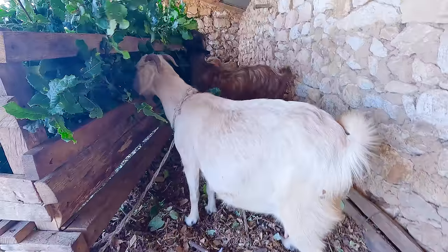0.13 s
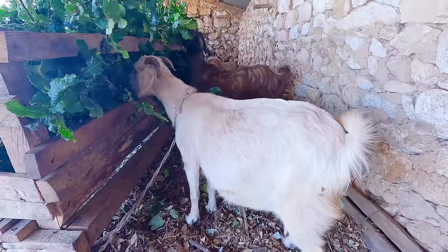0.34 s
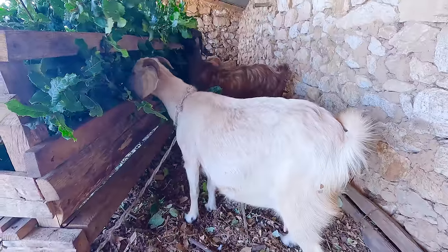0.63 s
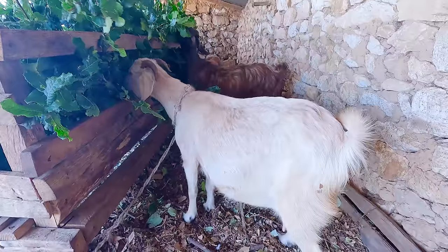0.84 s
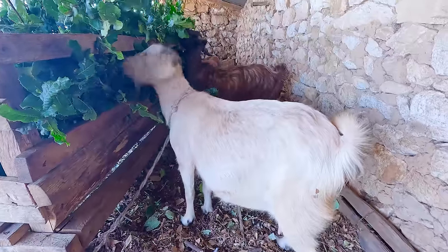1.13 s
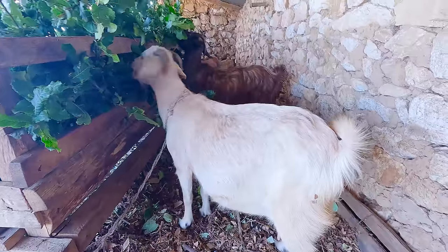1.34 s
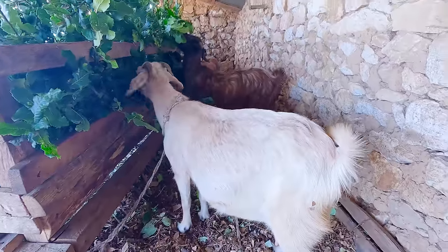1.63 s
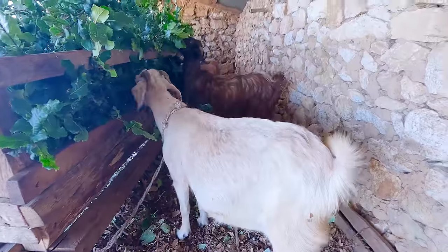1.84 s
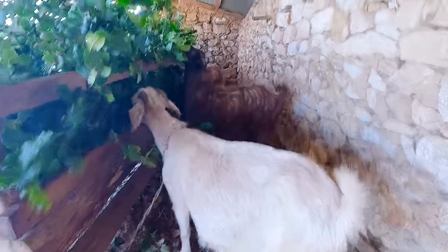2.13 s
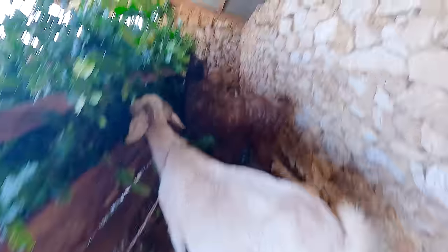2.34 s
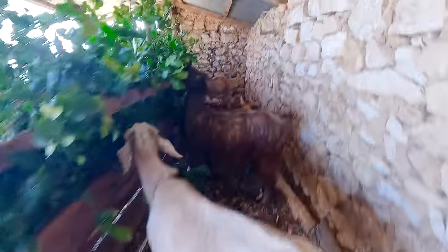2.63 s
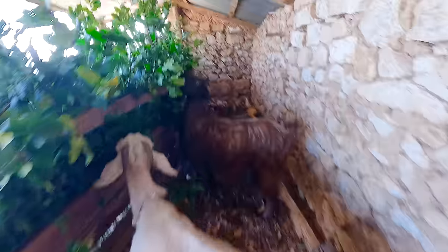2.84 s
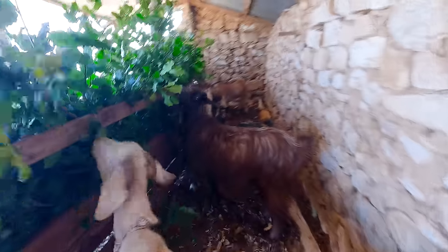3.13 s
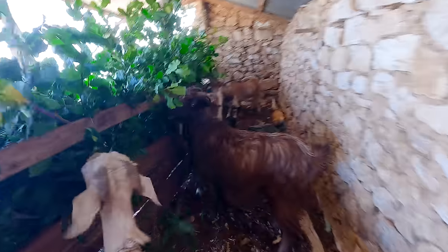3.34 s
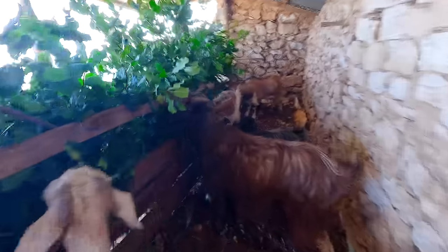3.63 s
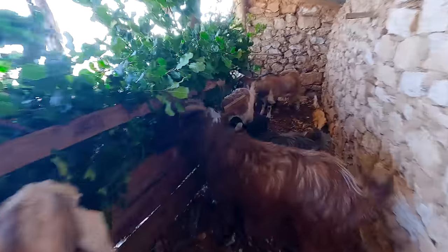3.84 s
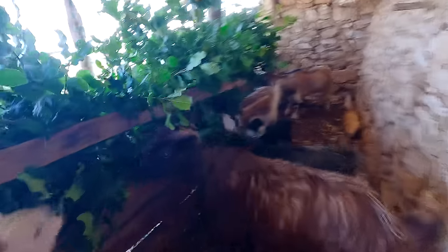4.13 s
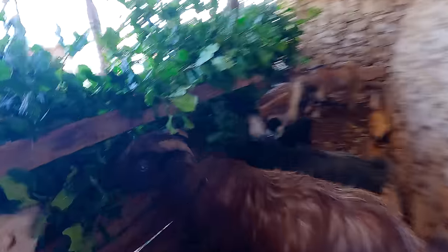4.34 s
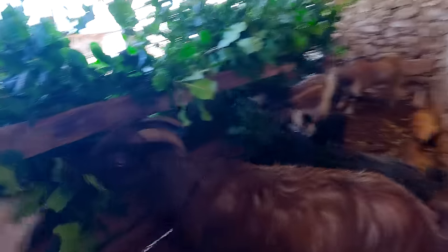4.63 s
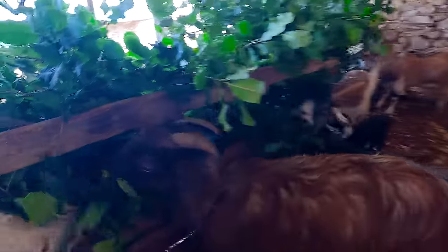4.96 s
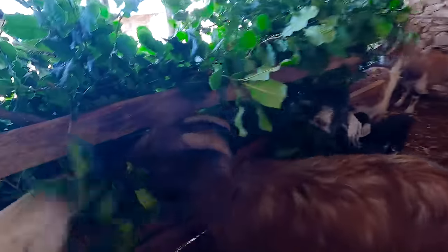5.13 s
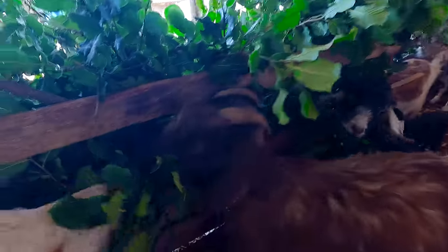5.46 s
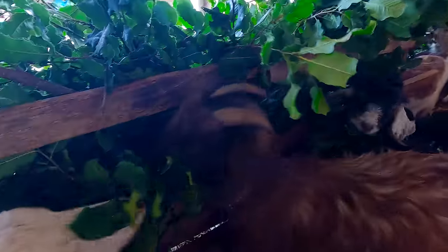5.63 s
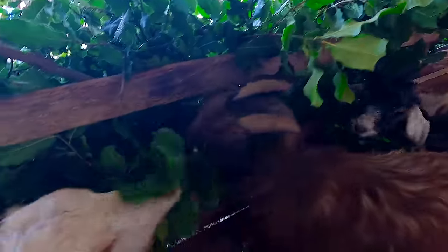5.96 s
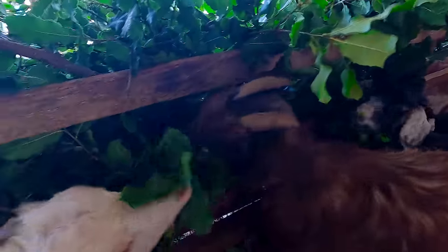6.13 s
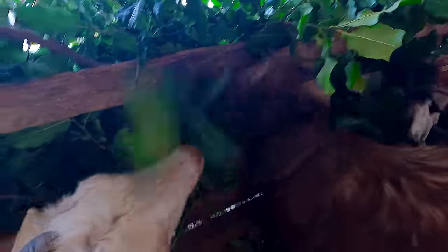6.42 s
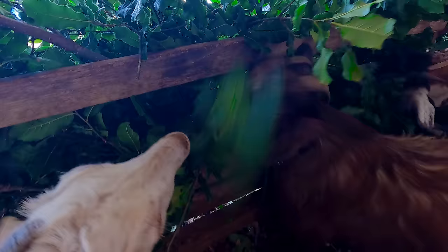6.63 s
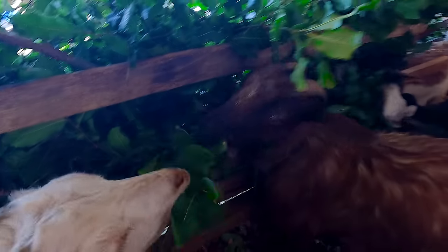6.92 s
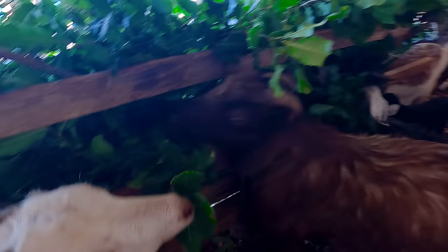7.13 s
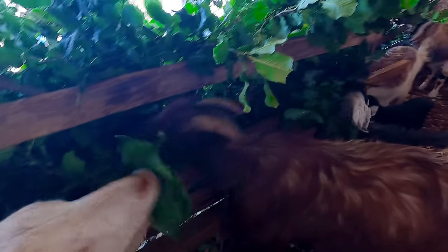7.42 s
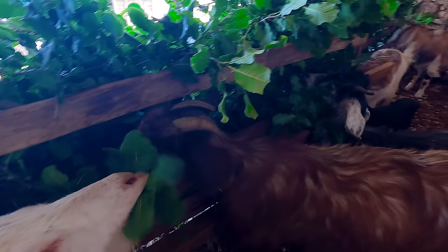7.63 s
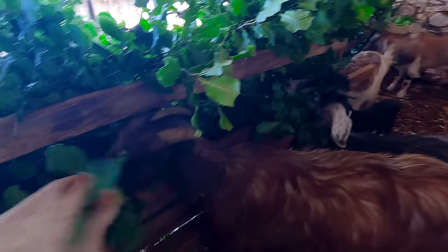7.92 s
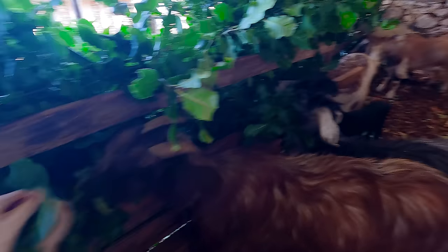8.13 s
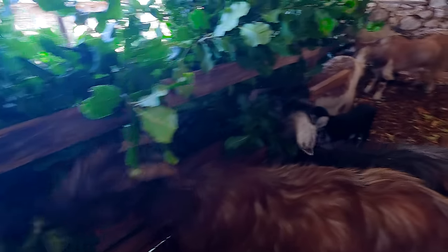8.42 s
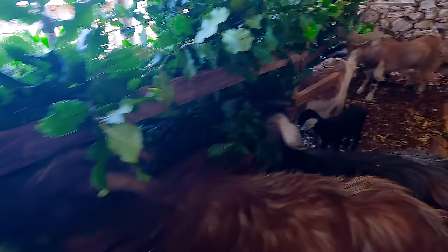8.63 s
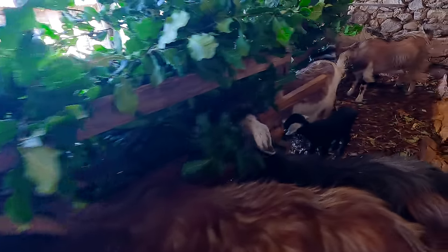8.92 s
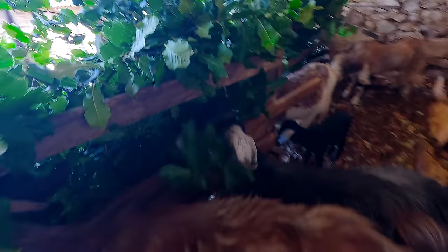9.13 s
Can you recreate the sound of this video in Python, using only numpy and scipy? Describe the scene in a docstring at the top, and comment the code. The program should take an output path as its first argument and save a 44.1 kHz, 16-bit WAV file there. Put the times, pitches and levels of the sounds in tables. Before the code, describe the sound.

A small leaf rustle opens, then stronger tugs come in bursts, brightest around five and nearly seven seconds. Crisp snaps, woody knocks, short hollow tones, a few wet lip smacks and tooth crunches punctuate them. Faint herd munching and low handling rumble lie underneath, heard close in a small, hard-walled shed.

```python
"""Goats feed on fresh leafy branches in a wooden rack inside a stone shed, heard from in front of them.
From the start tugs set stiff leaves crackling (resonant grains over hiss) and drag duller stems, over the
herd's faint munching and a low rumble (low noise) of hooves and handling, swelling in soft thuds.
Within a second stalks snap (noise bursts) and hollow knocks and tones sound (decaying modes); then lips
smack (wet ticks), teeth crunch (grit in mouth resonances), and leaves stir more in the second half."""
import sys
import numpy as np
from scipy import signal
from scipy.fft import rfft, irfft, next_fast_len
from scipy.io import wavfile
from scipy.ndimage import map_coordinates

SR = 44100
rng = np.random.default_rng(int(sys.argv[2]) if len(sys.argv) > 2 else 0)


def inscribe(sig):
    """Save sig as 16-bit PCM at rate SR to the path in sys.argv[1].

    A 1-D sig is mono; a 2-D sig holds one channel per row.
    Samples are clipped to [-1, 1] before scaling.
    """
    pcm = np.round(np.clip(np.atleast_2d(sig).T, -1, 1) * 32767)
    wavfile.write(sys.argv[1], SR, pcm.astype(np.int16))


N = 409688

# Leaves stirred by the whole herd. Each row: time in seconds, relative level in dB.
HERD_STIRRING = [(1.6, -52.5), (2.1, -49.5), (3.4, -50), (4.5, -46), (5.7, -46.5), (7, -45.5), (8.25, -49),
                 (9.29, -45.5)]


def amp(db):
    """Decibels to gain."""
    return 10 ** (np.asarray(db) / 20)


def unit(x):
    """Scale to rms 1."""
    return x / np.sqrt(np.mean(x ** 2) + 1e-20)


def fade(t, t60):
    """Exponential decay, down 60 dB after t60 seconds."""
    return np.exp(-np.log(1000) * t / np.maximum(t60, 1e-4))


def along(points, hz):
    """Read (Hz, value) points at the given frequencies on a log axis."""
    f, v = np.transpose(points)
    return np.interp(np.log(hz + 1), np.log(f), v)


def curve(rows):
    """Turn (s, value) rows into one value per sample."""
    return np.interp(np.arange(N) / SR, *np.transpose(rows))


def wobble(rate):
    """A smooth random curve with rate knots a second."""
    knots = rng.standard_normal(int(N * rate / SR) + 4)
    return map_coordinates(knots, [np.arange(N) * rate / SR])


def filtered(x, response):
    """Multiply the spectrum of x by a response of frequency."""
    m = next_fast_len(N + SR // 2)
    return irfft(rfft(x, m) * response(np.fft.rfftfreq(m, 1 / SR)), m)[..., :N]


def colour(x, spectrum, size=4096):
    """Causal (minimum-phase) filter of energy 1 with the given spectrum."""
    cepstrum = irfft(np.log(amp(along(spectrum, np.fft.rfftfreq(size, 1 / SR)))))
    kernel = irfft(np.exp(rfft(2 * cepstrum[:size // 2], size)))
    return signal.oaconvolve(x, kernel / np.linalg.norm(kernel))[:N]


def resonate(x, hz, q):
    """One damped resonance."""
    return signal.lfilter(*signal.iirpeak(min(hz, SR / 3), max(q, 1), SR), x)


def add(track, s, sound):
    """Mix a sound in at time s."""
    part = track[max(round(s * SR), 0):][:len(sound)]
    part += sound[:len(part)]


def ticks(rate, spread_db):
    """Random contacts, rate a second: many small, a few large."""
    sizes = amp(spread_db * np.minimum(rng.standard_normal(N), 1.8))
    touching = rng.random(N) < rate / SR
    signs = rng.choice([-1, 1], N)
    return unit(touching * sizes * signs / np.sqrt(rate))


def crackle(rate, spread_db, low_hz, high_hz, q, clump_db, count=8):
    """Pieces of several sizes, each ticking in its own clusters at its own pitch."""
    grains = np.zeros(N)
    for hz in np.geomspace(low_hz, high_hz, count):
        piece = resonate(ticks(rate / count, spread_db), hz, q)
        grains += piece * amp(clump_db * wobble(45))
    return unit(grains)


def pulls():
    """Levels in dB of leaves and of stems: each pull builds to its release, then the branch settles."""
    # A goat pulls a branch and lets go. Each row: release in seconds, relative rustle level in dB,
    # pull time in seconds, settling time in seconds, relative stem drag level in dB.
    tugs = [(0.045, -42.5, 0.04, 0.21, -61), (1.095, -34, 0.22, 0.11, -50.5),
            (2.296, -36.5, 0.27, 0.14, -46.5), (2.725, -41, 0.022, 0.1, -57),
            (2.836, -34.5, 0.18, 0.075, -43), (3.111, -34, 0.21, 0.13, -43), (3.345, -44, 0.076, 0.06, -70),
            (3.6, -48, 0.14, 0.39, -52), (3.92, -45, 0.35, 0.32, -51.5), (4.299, -34, 0.046, 0.073, -44.5),
            (4.79, -37, 0.24, 0.28, -45.5), (4.915, -34, 0.11, 0.11, -42), (5.125, -31, 0.24, 0.15, -45.5),
            (6.115, -39.5, .13, 0.081, -49), (6.18, -38, 0.13, 0.032, -43.5), (6.375, -34, 0.15, 0.29, -47),
            (6.712, -31, 0.028, 0.08, -39.5), (6.76, -32, 0.06, 0.035, -44),
            (7.108, -42.5, 0.012, 0.088, -40.5), (7.181, -37, 0.06, 0.3, -44),
            (7.438, -33, 0.06, 0.046, -49.5), (7.529, -40.5, 0.11, 0.4, -52.5),
            (7.72, -45, 0.13, 0.23, -50), (7.999, -43, 0.049, 0.15, -49), (8.187, -42, 0.04, 0.12, -54),
            (8.35, -42.5, 0.035, 0.14, -62), (8.484, -35, 0.095, 0.26, -45), (8.86, -43.5, .4, 0.35, -52.5),
            (9.1, -41.5, 0.073, 0.27, -52)]
    pull_db = 20  # rise over a pull time, and fall over a settling time
    roundness = 1.24  # above 1 a pull holds near its top, then drops away
    stirred_stems_db = -14  # stem drag under the herd's stirring
    t = np.arange(N) / SR
    leaf = amp(curve(HERD_STIRRING)) ** 2
    stem = leaf * amp(stirred_stems_db) ** 2
    for s, db, pull, settling, stem_db in tugs:
        slack = np.maximum((s - t) / pull, (t - s) / settling) ** roundness
        power = amp(-pull_db * slack) ** 2
        leaf = leaf + amp(db) ** 2 * power
        stem = stem + amp(stem_db) ** 2 * power
    return 10 * np.log10(leaf), 10 * np.log10(stem)


def leaves(tug_db):
    """A harder tug makes more leaves collide and sounds brighter, over the hiss of leaves sliding."""
    # Spectrum of the leaves. Each row: frequency in Hz, relative level in dB per Hz.
    leaf_spectrum = [(150, -5.5), (700, -11.5), (1050, 0), (2700, 0.5), (5000, 0.5), (7300, 0),
                     (8300, -4.5), (9800, -6), (10900, -16), (14300, -24), (15700, -45)]
    # Body of the rustle, below about 3 kHz. Each row: time in seconds, relative level in dB.
    fullness = [(1.05, -2), (2.2, -1), (2.85, 2), (4.3, 0), (5, -1), (6.15, 3.5), (6.4, -0.5), (8.5, 2.5)]
    effort_db = tug_db - tug_db.mean()
    contacts = 1800 * amp(.9 * effort_db)  # a second
    grains = crackle(contacts, spread_db=4.3, low_hz=1124, high_hz=12500, q=1.62, clump_db=4.5)
    sliding = amp(-1.5) * rng.standard_normal(N)
    rustle = unit(colour(grains + sliding, leaf_spectrum))
    dull = filtered(rustle, lambda hz: 1 / (1 + (hz / 3000) ** 4))
    bright = rustle - dull
    # harder tugs have less body, so they sound brighter
    body_db = curve(fullness) - 0.13 * effort_db + 1.94 * wobble(12)
    # single leaves catch and let go
    flutter_db = wobble(30) + 1.8 * wobble(140)
    return amp(tug_db + flutter_db - 1.45) * (bright + dull * amp(body_db))


def stems(drag_db):
    """Thick stems stick and slip on the boards with a duller rattle; each tug jerks them along."""
    # Spectrum of the stems. Each row: frequency in Hz, relative level in dB per Hz.
    stem_spectrum = [(60, -32), (150, -3), (300, -4.5), (520, -2), (750, -4), (1100, -5.5), (1800, -8.5),
                     (3500, -32), (9000, -47)]
    grains = crackle(2000, spread_db=4, low_hz=167, high_hz=2670, q=2.7, clump_db=3)
    rubbing = amp(-2.5) * rng.standard_normal(N)
    rattle = unit(colour(grains + rubbing, stem_spectrum))
    return amp(drag_db + 1.2 * wobble(25)) * rattle


def chewing(count=6):
    """The rest of the herd munches: faint wet ticks, each mouth at its own resonance."""
    munching = np.zeros(N)
    for hz in np.geomspace(1000, 4200, count):
        mouth = resonate(resonate(ticks(2500, 2.4), hz, 1.4), hz, 1.0)
        munching += unit(mouth) * amp(5.2 * np.minimum(wobble(26), 1))
    return amp(curve(HERD_STIRRING) - 8.5) * unit(munching)


def low_rumble():
    """Hooves and camera handling: low noise, separate for middle and side, swelling together in soft thuds."""
    # Swells of the low rumble. Each row: time in seconds, relative level in dB.
    thuds = [(1.7, -62), (2.9, -55), (3.7, -59.5), (4.3, -49), (4.9, -53), (5.6, -67.5), (6.5, -56),
             (8.2, -57), (9.1, -64), (9.2, -49.5)]
    # Spectrum of the rumble. Each row: frequency in Hz, relative level in dB per Hz.
    rumble_spectrum = [(40, 3), (85, -0.5), (150, -7), (300, -18), (900, -62.5)]
    swell = amp(curve(thuds) + 3 * wobble(12))
    return [swell * unit(colour(rng.standard_normal(N), rumble_spectrum)) for _ in range(2)]


def snaps():
    """A fibre breaks with one hard crack, then its neighbours tear; louder stalks tear for longer."""
    # Stalks and leaves snapping. Each row: time in seconds, relative level in dB, ring of the stalk in Hz.
    breaks = [(0.5201, -24, 5500), (1.0095, -18, 6800), (2.151, -15.5, 3200), (2.2661, -15, 1600),
              (2.3036, -10, 7000), (2.3084, -13, 6700), (2.888, -19, 2780), (3.015, -20, 7000),
              (3.0963, -9, 2400), (3.6266, -12, 6800), (3.7822, -19, 2900), (4.907, -16.5, 2300),
              (5.0029, -15.5, 7600), (5.1082, -8, 8500), (5.1266, -7.5, 4270), (5.2918, -19, 3300),
              (5.998, -20, 5500), (6.317, -12.5, 1450), (6.6452, -16.5, 2630), (6.6988, -10, 1400),
              (6.7049, -13.5, 6150), (6.737, -17, 4130), (6.7635, -9.5, 2710), (7.1605, -17, 1940),
              (7.81, -12.5, 2900), (8.4361, -16, 6000), (8.4715, -9.5, 6500), (8.531, -10, 3400)]
    # Spectrum of the cracks. Each row: frequency in Hz, relative level in dB per Hz.
    crack_spectrum = [(100, -8), (500, -1), (1500, -2), (7400, 1), (10000, -5.5), (12000, -14),
                      (15500, -35)]
    ring_db, stalk_q = -3, 1.2  # tone of the stalk against the bare crack, and its sharpness
    out, t = np.zeros(N), np.arange(SR // 8) / SR
    for s, db, hz in breaks:
        life = .0095 * amp(.4 * (db + 12))  # seconds
        tearing = fade(t, life) + 0.1 * fade(t, 3 * life)
        burst = rng.standard_normal(len(t)) * tearing
        burst[0] += .5 * np.linalg.norm(burst)  # the first break
        crack = unit(burst) + amp(ring_db) * unit(resonate(burst, hz, stalk_q))
        level = amp(db - 19.0) * np.sqrt(life * SR)
        add(out, s + 0.0012, level * crack / np.linalg.norm(crack))
    return colour(out, crack_spectrum)


def hollow_sounds():
    """Hollow knocks and short hollow tones: one decaying mode each, with noise in a broad resonance on it."""
    # Hollow knocks, and short hollow tones near 500 Hz, perhaps grunts or a distant coo.
    # Each row: time in seconds, relative level in dB, pitch in Hz.
    hollows = [(0.586, -46, 386), (0.935, -46.5, 172), (1.077, -35.5, 603), (1.44, -49.5, 573),
               (1.934, -48.5, 480), (2.025, -48, 495), (2.444, -42, 525), (2.494, -40, 490),
               (2.525, -42.5, 440), (2.97, -40, 540), (3.387, -42, 542), (3.626, -37.5, 750),
               (4.129, -32.5, 440), (4.16, -40.5, 179), (4.221, -39, 132), (4.28, -40, 149),
               (4.39, -42.5, 119), (4.549, -36, 370), (4.717, -37, 393), (4.857, -40.5, 237),
               (5.021, -34.5, 413), (5.556, -42, 320), (6.19, -35.5, 505), (6.722, -39, 280),
               (7.1, -38, 268), (7.339, -37.5, 238), (7.37, -37.5, 140)]
    ring_cycles = 21.4  # cycles to fall 60 dB, so low ones last longer
    out, t = np.zeros(N), np.arange(SR // 3) / SR
    for s, db, hz in hollows:
        life = ring_cycles / hz
        onset = 1 - fade(t, 6 / hz)
        ring = np.sin(2 * np.pi * hz * t) * fade(t, life) * onset
        noise = rng.standard_normal(len(t)) * fade(t, 2 * life)
        hollow = unit(ring) + unit(resonate(resonate(noise, hz, 1.4), hz, 1.4))
        add(out, s + 0.00308, amp(db + 25.0) * hollow / np.linalg.norm(hollow))
    return out


def smacks():
    """Lips and tongue part: a swell of wet ticks through a mouth resonance that sinks as the jaw moves."""
    # Wet smacks of a chewing mouth. Each row: middle in seconds, relative level in dB,
    # length in seconds, central mouth resonance in Hz.
    partings = [(1.398, -47, 0.028, 1960), (1.488, -43.5, 0.048, 1610), (5.337, -37.5, 0.035, 2400),
                (5.44, -41.5, 0.023, 2850)]
    out, t = np.zeros(N), np.arange(N) / SR
    wet = ticks(4000, 3)
    for s, db, length, hz in partings:
        opening = (t - s) / length
        early, late = [unit(resonate(resonate(wet, f, 3.7), f, 1.7)) for f in (hz * 1.04, hz / 1.18)]
        jaw = np.clip(.5 + opening, 0, 1)
        swell = np.exp(-(2 * opening) ** 2)
        out += amp(db) * swell * ((1 - jaw) * early + jaw * late)
    return out


def crunches():
    """A bite crushes a stalk: a click and a gritty smear in two resonances of the mouth."""
    # Teeth crunching on stalks. Each row: time in seconds, relative level in dB, pitch in Hz.
    bites = [(2.238, -29, 1200), (3.535, -31.5, 1100), (3.84, -31, 1550), (3.939, -25, 1410),
             (3.962, -26, 1650), (4.134, -32, 840), (4.889, -28, 1200), (5.186, -31.5, 820),
             (7.1, -24, 910), (7.112, -26, 1400), (7.489, -31, 865), (7.916, -31.5, 1300),
             (8.63, -31, 1200)]
    out, t = np.zeros(N), np.arange(SR // 8) / SR
    for s, db, hz in bites:
        click_and_smear = fade(t, 0.012) + 0.46 * fade(t, 0.045)
        roughness = amp(5.3 * rng.standard_normal(len(t)))
        grit = rng.standard_normal(len(t)) * roughness * click_and_smear
        low = resonate(resonate(grit, hz, 2.7), hz, .8)
        bite = low + 0.42 * resonate(grit, hz * 1.94, 5.9)
        add(out, s + 0.001506, amp(db + 18.5) * bite / np.linalg.norm(bite))
    return out


def shed(x, size=1024, count=64):
    """The walls answer: each short block of sound meets its own random pair of reflection patterns."""
    # Decay of the shed. Each row: frequency in Hz, time to fall 60 dB in seconds.
    wall_decay = [(150, 0.33), (1500, 0.15), (6000, 0.16), (13000, 0.12)]
    out, t = np.zeros((2, N)), np.arange(SR // 6) / SR
    hz, frames, z = signal.stft(rng.standard_normal((count, len(t))), SR, nperseg=256)
    decaying = z * fade(frames, along(wall_decay, hz)[:, None])
    tails = signal.istft(decaying, SR, nperseg=256)[1][:, :len(t)]
    tails *= (1 + 3.8 * fade(t, 0.028)) * (t > .002)  # near boards answer first
    tails /= np.linalg.norm(tails, axis=1, keepdims=True)
    for start in range(0, N, size):
        block = x[start:start + size]
        for channel, tail in zip(out, rng.choice(tails, 2, replace=False)):
            add(channel, start / SR, signal.fftconvolve(block, tail))
    return out


def scene():
    """Feeding sounds arrive from ahead; their reflections spread to the sides."""
    # Stereo spread. Each row: frequency in Hz, likeness of left and right from 0 to 1.
    likeness = [(100, 0.85), (400, 0.92), (1000, 0.83), (2200, 0.57), (4500, 0.67), (9000, 0.79),
                (12500, 0.19)]
    # Drift of the whole image. Each row: time in seconds, left minus right in dB.
    bearing = [(3, -2.5), (3.8, -1), (5.2, -3), (7.2, -4), (8.3, -1.5)]
    tug_db, drag_db = pulls()
    feeding = leaves(tug_db) + stems(drag_db) + chewing() + snaps() + hollow_sounds() + smacks() + crunches()
    echo, wide = shed(feeding)
    mid_rumble, side_rumble = low_rumble()
    mid = amp(0.85) * feeding + amp(-4.0) * echo + mid_rumble

    def side_gain(hz):
        """The less alike the channels, the more side signal."""
        return np.tan(np.arccos(np.clip(along(likeness, hz), 0, 1)) / 2)

    side = filtered(wide + side_rumble, side_gain)
    return np.array([mid + side, mid - side]) * amp(np.outer([.5, -.5], curve(bearing)))


def record(dry):
    """The left microphone is a little brighter; nothing passes above the band limit."""
    # Tone of the microphone pair. Each row: frequency in Hz, left minus right in dB.
    balance = [(200, 1), (1000, 3.5), (4000, 3), (8000, 4), (12500, 7.5)]
    top_hz = 15800

    def response(hz):
        """Half the difference to each side, cut off at the top."""
        return amp(np.outer([.5, -.5], along(balance, hz))) * (hz < top_hz)

    return filtered(dry, response)


dry = scene()
out = record(dry)
inscribe(out)
```